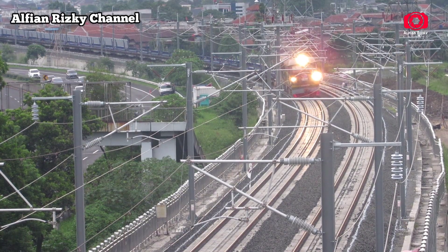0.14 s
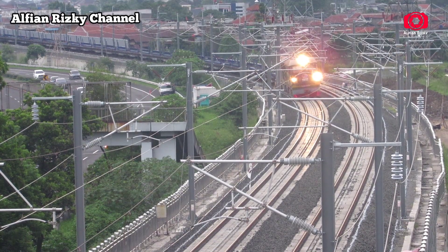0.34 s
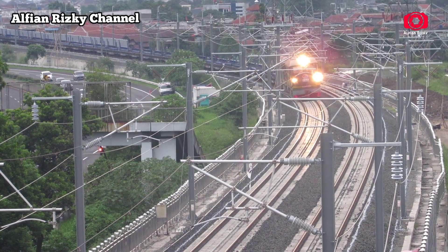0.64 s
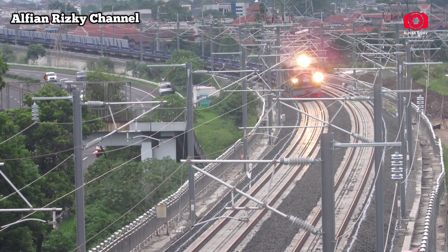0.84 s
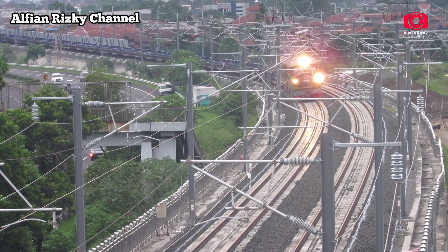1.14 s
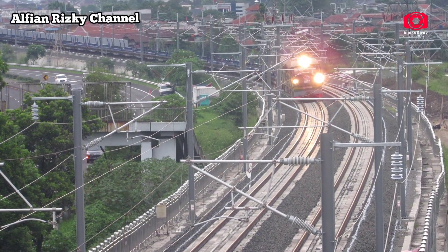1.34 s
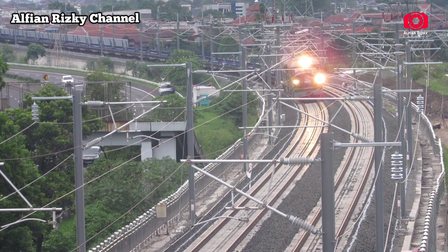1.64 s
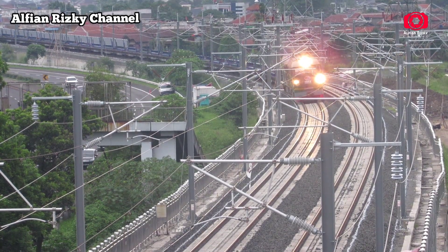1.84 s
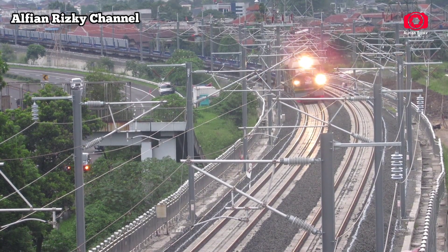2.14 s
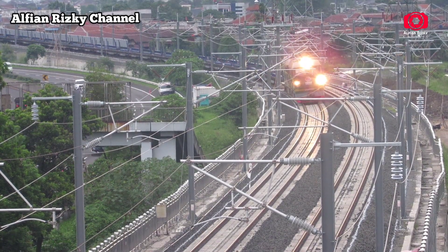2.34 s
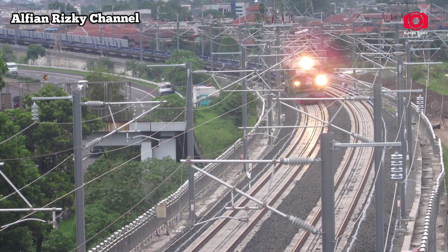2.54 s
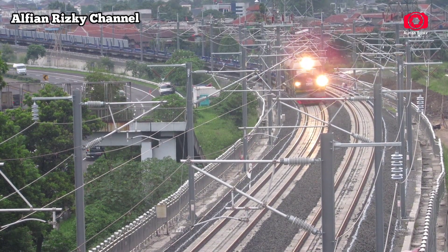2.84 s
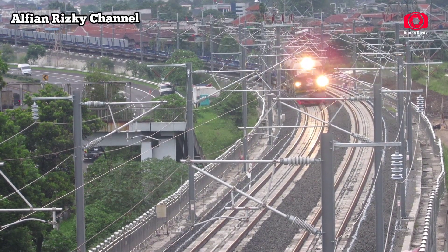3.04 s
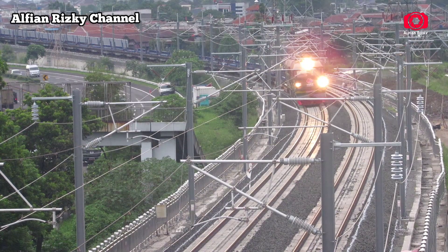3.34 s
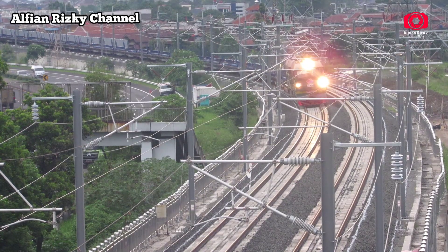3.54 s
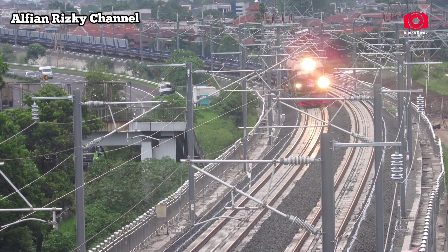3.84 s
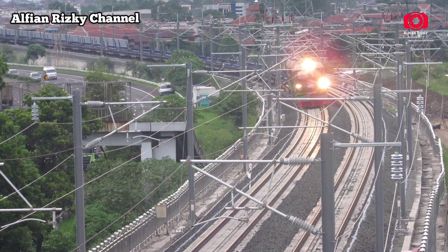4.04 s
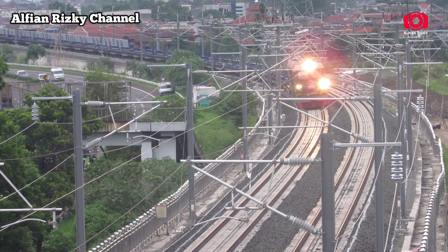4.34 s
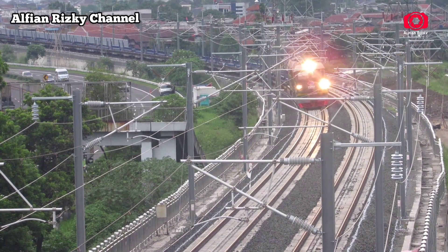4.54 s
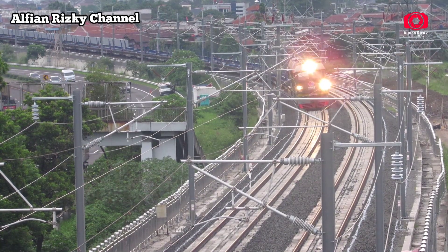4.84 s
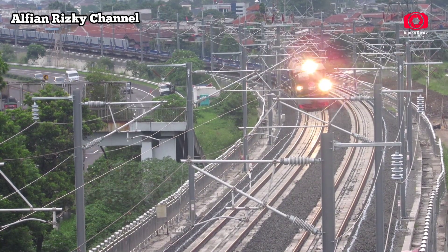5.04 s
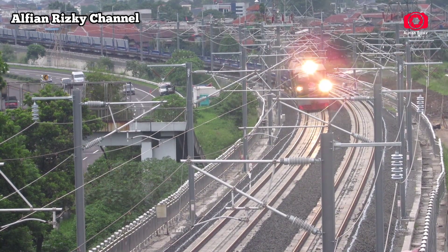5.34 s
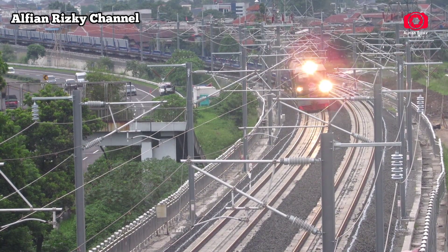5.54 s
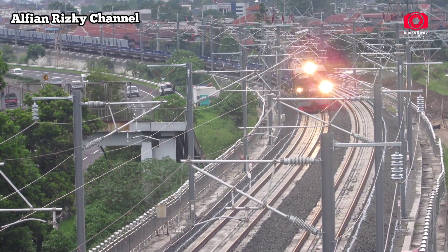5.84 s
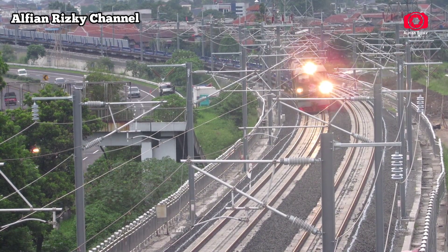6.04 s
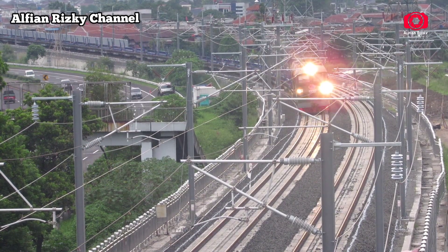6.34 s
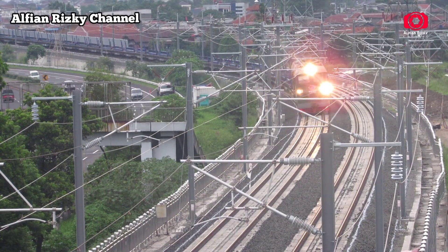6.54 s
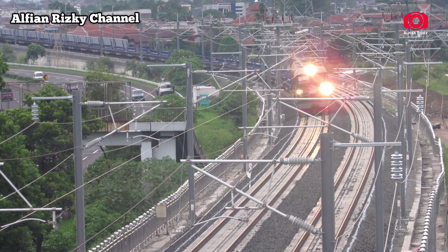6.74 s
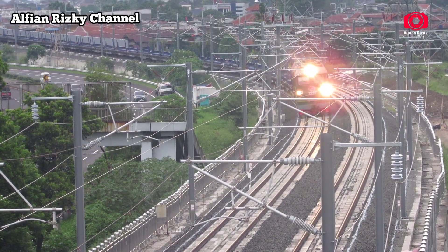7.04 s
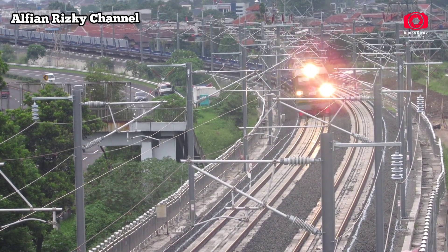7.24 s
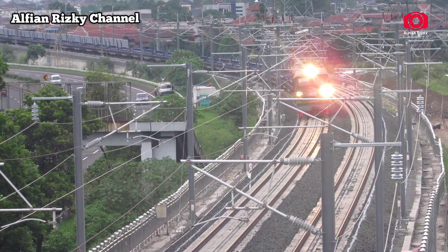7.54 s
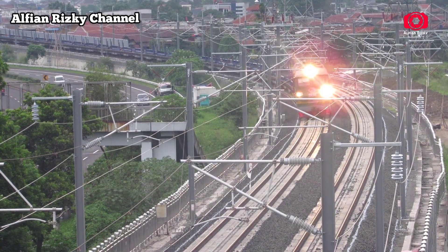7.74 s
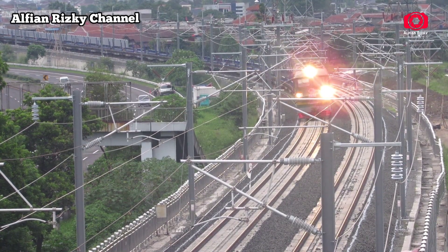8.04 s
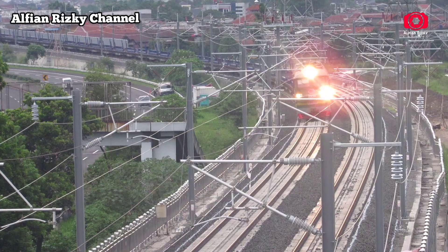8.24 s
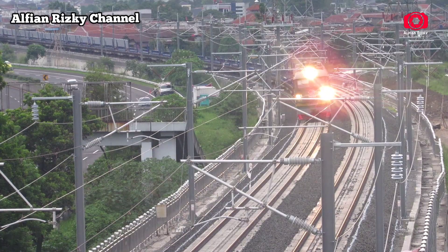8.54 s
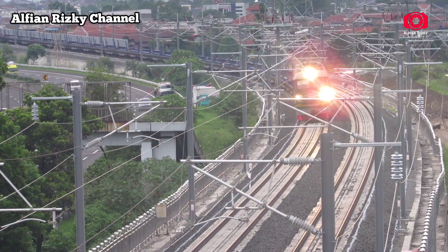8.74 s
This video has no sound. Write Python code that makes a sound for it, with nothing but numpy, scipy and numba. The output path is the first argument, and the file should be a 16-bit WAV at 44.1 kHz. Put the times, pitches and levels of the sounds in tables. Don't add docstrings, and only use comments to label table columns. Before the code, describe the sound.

Loud ragged motorcycle popping fades at about three seconds, giving way to swelling road traffic with droning engines, tyre roar, swishes and wind buffets.

```python
import sys
import numpy as np
from scipy import signal
from scipy.fft import rfft, irfft, next_fast_len
from scipy.io import wavfile
from scipy.ndimage import uniform_filter1d
from numba import njit

SR = 44100
rng = np.random.default_rng(int(sys.argv[2]) if len(sys.argv) > 2 else 0)


def log_audio(samples):
    frames = np.atleast_2d(samples).T
    limited = np.clip(frames, -1, 1)
    pcm = np.round(limited * 32767).astype(np.int16)
    wavfile.write(sys.argv[1], SR, pcm)


def gain_from_db(level_db):
    decades = np.asarray(level_db, float) / 20
    return 10 ** decades


N = 392049

# time [s], thump [dB],
# crack [dB], crack colour [Hz].
EXHAUST_POPS = [(0.0105, -8.0, -41, 6900), (0.0315, -8.0, -45, 9000), (0.0573, -9.5, -43, 6500),
                (0.0829, -9.0, -43, 11500), (0.1008, -8.5, -42, 11900), (0.1268, -13.0, -42, 7200),
                (0.162, -6.0, -54, 10200), (0.1789, -7.0, -52, 8400), (0.2086, -6.0, -51, 5000),
                (0.2336, -5.0, -56, 5300), (0.2598, -6.5, -43, 5000), (0.2835, -8.0, -43, 6900),
                (0.3085, -3.5, -38, 5000), (0.3326, -10.0, -50, 10300), (0.3572, -1.5, -43, 5200),
                (0.3773, -12.0, -48, 4700), (0.4244, -11.5, -51, 5200), (0.4593, -12.0, -53, 9300),
                (0.471, -10.5, -47, 9500), (0.4878, -10.0, -51, 6200), (0.5232, -9.0, -43, 4300),
                (0.5405, -9.0, -47, 6500), (0.565, -9.5, -45, 5700), (0.5828, -12.0, -52, 6700),
                (0.6115, -7.5, -46, 5500), (0.6279, -10.5, -46, 5700), (0.6623, -8.0, -38, 8300),
                (0.678, -9.0, -41, 5700), (0.7031, -9.5, -42, 5900), (0.7453, -7.0, -52, 9100),
                (0.7944, -10.5, -54, 7200), (0.8137, -3.5, -53, 7200), (0.8449, -9.0, -50, 6200),
                (0.9114, -5.0, -48, 8800), (0.9635, -3.0, -50, 6700), (1.0067, -4.5, -48, 7400),
                (1.0368, -6.0, -55, 5500), (1.0551, -5.0, -51, 7400), (1.0733, -5.5, -55, 9100),
                (1.1096, -5.5, -53, 8800), (1.1388, -6.5, -52, 5000), (1.2377, -6.5, -48, 7200),
                (1.2816, -7.5, -42, 10000), (1.3102, -8.5, -38, 7200), (1.3394, -8.0, -37, 5500),
                (1.3681, -10.0, -40, 9600), (1.4048, -9.0, -39, 10000), (1.4329, -8.5, -39, 7900),
                (1.4611, -10.5, -42, 11000), (1.5184, -10.5, -49, 10700), (1.5536, -7.5, -37, 9500),
                (1.5811, -7.0, -45, 12700), (1.6238, -11.0, -44, 6200), (1.6513, -9.5, -48, 5900),
                (1.694, -8.0, -39, 7100), (1.7222, -7.0, -39, 7200), (1.7718, -12.0, -50, 8100),
                (1.7929, -7.5, -38, 7400), (1.8344, -6.5, -38, 8100), (1.8617, -7.5, -44, 9000),
                (1.9082, -10.0, -45, 8800), (1.9278, -6.5, -34, 12900), (1.9601, -5.0, -37, 8600),
                (1.978, -6.5, -40, 8100), (2.0096, -5.5, -37, 10200), (2.0212, -7.0, -37, 8800),
                (2.0541, -5.5, -36, 9800), (2.074, -4.0, -36, 8800), (2.0936, -7.5, -43, 9300),
                (2.1129, -11.0, -50, 6200), (2.1458, -6.0, -35, 11700), (2.1904, -5.5, -42, 6700),
                (2.2071, -10.0, -47, 6900), (2.2342, -5.5, -40, 11500), (2.2512, -13.5, -51, 10000),
                (2.3014, -4.5, -44, 6000), (2.388, -7, -37, 9000), (2.4437, -9.5, -46, 11400),
                (2.4713, -13.0, -58, 10000), (2.5609, -10.5, -51, 7100), (2.6061, -11.0, -46, 7100),
                (2.6287, -12.5, -51, 8600), (2.658, -10.5, -46, 10700), (2.6729, -10.5, -45, 10300),
                (2.7098, -8.0, -47, 7900), (2.7322, -10.5, -47, 8400), (2.7544, -10.0, -43, 8400),
                (2.7835, -11.5, -47, 12600), (3.0814, -13.5, -49, 7100),
                (1.3969, -23, -41, 7120), (1.4897, -11.5, -47, 9140), (1.953, -26, -54, 8710),
             (2.217, -18, -42, 9900), (2.245, -24, -44, 10540), (2.508, -16, -60, 7930),
             (2.614, -10, -44, 7120), (2.681, -17, -50, 7640), (2.796, -24, -55, 7130),
             (3.1386, -13, -52, 8030)]
# time [s], level [dB].
FAR_THUDS = [(2.9158, -15.5), (3.359, -19), (3.3782, -18), (3.4184, -15), (3.8719, -15), (4.1499, -9),
             (4.1655, -8), (4.9722, -7), (5.2672, -5), (5.6491, -16), (6.1483, -9), (6.1662, -10.5),
             (6.2722, -9), (6.3786, -11.5), (6.4153, -4), (6.628, -12), (6.6567, -8), (6.8434, -15),
             (6.9344, -20), (7.1086, -7.5), (7.3774, -13), (7.4603, -13), (7.5243, -7), (7.5984, -5),
             (7.6297, -3), (7.664, -8), (7.68, -13), (7.7362, -16), (7.803, -14), (7.8242, -7),
             (8.239, -21)]
# time from its peak [s], half length [s], size.
BLAST_SHAPE = [
    (-.0016, 0.00043, -1.25),
    (0, 0.00045, 1),
    (.0009, 0.0021, 0.17),
    (.003, 0.00077, -0.26),
]
# time [s], broad boom [dB], upper edge of the blast [dB], shell knock [dB].
SILENCER = [(0, -5, 2.5, 0), (.3, -8, 3.5, 4), (.6, -4, 4, -4), (.9, -7.5, 1.5, -6), (1.2, 1, 0, -6),
            (1.28, -0.5, -15, -13), (1.55, 1.5, -3, -7), (1.9, -2.5, 1, -4), (2.1, -15, 1, 0),
            (2.3, -14, 2.5, 9), (2.42, 2, 1.5, 4), (2.8, -12, -1, 2)]
# time [s], pitch [Hz], level [dB].
RING_NOTE = [
    (0.38, 201, -32),
    (0.44, 167, -31),
    (1.2, 165, -32),
    (1.26, 137, -30),
    (1.8, 143, -30),
    (2.05, 182, -31),
    (2.32, 181, -32),
    (2.4, 138, -36),
    (2.8, 138, -37),
]
# multiple of the loudest note, level [dB].
RING_ORDERS = [(1, 0), (1.75, -12), (2, -6), (3, -8), (4, -12)]
# centre [Hz], width [Hz], level [dB].
SHELL_MODES = [(900, 140, 2), (1270, 240, -2), (1520, 140, -9)]
# time [s], steady shell rasp [dB], tail-pipe whistle [dB], wall slap [dB].
BIKE_PLACE = [(0, -40.5, 6, -26), (.58, -40.5, -12, -16), (.7, -69, 4, -20), (1.25, -68, -3, -26),
              (1.45, -83, 2, -24), (1.8, -45, 1, -21), (2.1, -58, -12, -5.5), (2.26, -55, -6, -6),
              (2.3, -54, -1, -17), (2.5, -58, -4, -17), (2.85, -68, -3, -10)]
# time [s], level [dB].
THROTTLE = [
    (0, 2),
    (.44, -0.5),
    (.69, 0.5),
    (1.08, -9.5),
    (1.55, -4.5),
    (2.15, -0.5),
    (2.43, -11.5),
    (2.8, -13.5),
    (3.1, -17),
]
# time [s], level [dB].
NEARNESS = [(0, -13), (1.1, -17), (2.1, -13.5), (2.43, -13.5), (3.14, -9), (3.81, -4.5), (4.2, -0.5),
            (4.63, 1.5), (5.2, 0), (5.57, -1.5), (6.35, 1.5), (6.64, 0.5), (6.95, 2.5), (7.65, 1.5),
            (7.92, -0.5), (8.3, 0.5), (8.89, 0)]
# frequency [Hz], density [dB per Hz].
RUMBLE_SPECTRUM = [(25, -14), (42, -32), (65, -3.5), (110, 0.5), (175, 1), (240, -3.5), (320, -6.5),
                   (420, -9), (520, -17), (700, -20)]
# frequency [Hz], density [dB per Hz].
ROAR_SPECTRUM = [(600, -3.5), (850, 5.5), (1200, 2), (1500, -5), (2000, -14.5), (3000, -22.5), (4500, -30)]
# frequency [Hz], density [dB per Hz].
HISS_SPECTRUM = [(1800, 12), (2500, 7.5), (4000, 3.5), (6000, 3), (9000, 3.5), (11500, 0.5), (14500, -4.5)]
# start [s], end [s], level [dB].
SWISHES = [
    (4.68, 4.87, -46),
    (5.115, 5.237, -47),
    (5.404, 5.933, -52.5),
    (6.396, 6.58, -55.5),
    (6.826, 6.98, -44),
    (7.077, 7.218, -47),
    (7.423, 8.146, -49.5),
    (8.255, 8.3, -52.5),
    (8.64, 8.71, -50),
]
# start [s], end [s], level [dB], centre [Hz].
SPRAY = (7.52, 8.14, -48, 12800)
# start [s], end [s], pitch [Hz], level [dB].
SQUEALS = [
    (8.12, 8.301, 2800, -55),
    (8.122, 8.3, 3260, -63),
    (8.5, 8.682, 3530, -67),
]
# start [s], end [s], firing
# at start [Hz], at end [Hz], level [dB].
DRONES = [(0, .33, 111, 124, -38), (0, .3, 228, 238, -36), (.95, 1.65, 98, 110, -41),
          (.62, .7, 250, 258, -31), (1.9, 2.35, 88, 128, -37), (.2, .38, 200, 204, -33),
          (.45, .85, 168, 160, -36), (1.14, 1.22, 165, 160, -35), (1.85, 2.05, 150, 182, -36),
          (2.43, 2.5, 255, 258, -39), (2.57, 2.82, 258, 276, -35), (2.57, 2.8, 385, 420, -43),
          (1.8, 2.05, 290, 370, -41), (2.95, 3.5, 300, 357, -48), (3.56, 4.55, 348, 398, -45),
          (4.0, 4.6, 245, 255, -38), (4.4, 5.0, 128, 131, -31), (5.05, 5.35, 140, 148, -28),
          (4.55, 4.85, 178, 182, -31), (4.9, 5.3, 185, 170, -29), (5.85, 6.3, 395, 410, -41),
          (5.55, 5.7, 205, 198, -32), (4.7, 5.3, 78, 74, -41), (7.7, 8.1, 88, 95, -39),
          (7.0, 7.15, 225, 220, -33), (6.3, 6.7, 135, 130, -33), (7.2, 7.5, 340, 355, -40),
          (5.75, 6.0, 170, 165, -27), (6.15, 6.7, 166, 155, -30), (6.8, 7.4, 160, 175, -29.5),
          (7.55, 7.75, 203, 200, -27), (7.95, 8.3, 186, 186, -28), (8.36, 8.89, 184, 192, -26),
          (8.65, 8.89, 150, 146, -29)]
# multiple of the firing note, level [dB].
DRONE_ORDERS = [(1, 2.5), (2, -14)]
# centre [s], length [s], level [dB].
GUSTS = [
    (3.87, .04, -26),
    (3.96, .05, -26),
    (4.25, .11, -26),
    (4.56, .08, -38),
    (6.95, .15, -33),
    (8.5, .2, -37),
    (8.72, .13, -22),
    (6.8, 2.8, -40),
]
# frequency [Hz], shared part [dB], phase lead [rad], unshared part [dB].
PORTS = [(40, -9.5, 2.44, -31), (180, -9, 3.34, -31.5), (504, -8, 2.57, -27.5), (1060, -5.5, 1.875, -13),
         (1810, -4.5, 1.1, -10), (2800, -5.5, 0.4, -8), (4600, -9.5, .12, -8), (7300, -12.5, 0.97, -10.5),
         (12500, -15, 2.14, -13), (14800, -24, 2.5, -14)]
# upper edge [Hz], level under which the band is dropped [dB].
TOP_BANDS = [(13300, -76), (14200, -72), (15150, -63.5)]


def motorcycle():
    s, thump_db, rasp_db, crack_db, crack_hz = firings()
    thump = silencer(exhaust_blast(s, thump_db))
    return thump + shell_rasp(s, thump_db, rasp_db) + gas_crack(s, crack_db, crack_hz)


def firings():
    s, thump_db, crack_db, crack_hz = np.transpose(sorted(EXHAUST_POPS))
    throttle_db = np.interp(s, *np.transpose(THROTTLE))
    scatter_db = 1.5 * rng.standard_normal(len(s))
    rasp_db = thump_db - 20 + throttle_db + scatter_db
    return s, thump_db, rasp_db, crack_db, crack_hz


def exhaust_blast(s, thump_db):
    round_trip_s, returned = 0.00756, 0.15
    open_end_hz, muffle_hz = 67.5, 694
    rebound_s, rebound_half_s, rebound_size = 0.0029, 0.0012, 0.2
    t = np.arange(2000) / SR
    blast = sum(size * np.exp(-((t - .004 - at) / half) ** 2) for at, half, size in BLAST_SHAPE)
    far_s, far_db = np.transpose(FAR_THUDS)
    near = spikes(s - .0045, gain_from_db(thump_db - 2.85))
    far = spikes(far_s - .0045, gain_from_db(far_db))
    thump = shape(near + far, blast)
    boom_db = curve(SILENCER)[0]
    suction = -rebound_size * np.exp(-((t - .004 - rebound_s) / rebound_half_s) ** 2)
    thump = thump + gain_from_db(boom_db) * shape(spikes(s - .0045, gain_from_db(thump_db)), suction)
    loop = np.zeros(int(round_trip_s * SR) + 21)
    loop[0] = 1
    loop[-41:] = -returned * np.hanning(41) / 20
    thump = signal.lfilter([1], loop, thump)
    thump = signal.sosfilt(signal.butter(2, open_end_hz, "high", fs=SR, output="sos"), thump)
    return signal.sosfilt(signal.butter(4, muffle_hz, fs=SR, output="sos"), thump)


def silencer(thump):
    boom_db, knock_db, _ = curve(SILENCER)
    ring_hz, ring_db = curve(RING_NOTE)
    lower_chamber = gain_from_db(6) * band(thump, 0.7 * ring_hz, 22)
    boom = band(thump, ring_hz, 45) + lower_chamber
    knock = band(thump, 590, 256)
    thump = thump + gain_from_db(boom_db - 4.5) * boom + (gain_from_db(knock_db) - 1) * knock
    order_db = np.clip(ring_db + 33, -3, 5)
    thump = thump + sum(gain_from_db(order_db + db) * band(thump, k * ring_hz, 20 * k) for k, db in RING_ORDERS[1:])
    thump = thump + 1.8 * gain_from_db(ring_db + 31) * band(thump, ring_hz, 12)
    turn = 2 * np.pi * np.cumsum(ring_hz * (1 + .01 * walk(12))) / SR
    hum = sum(gain_from_db(2.3 * db + 1.5 * walk(14)) * np.sin(k * turn) for k, db in RING_ORDERS)
    return thump + gain_from_db(ring_db) * gate(0, 2.8, 1, 0.023) * hum


def shell_rasp(s, thump_db, rasp_db):
    shell = unit(sum(gain_from_db(db) * twice(white(), hz, wide_hz) for hz, wide_hz, db in SHELL_MODES))
    shell_db, steady_db = curve(SILENCER)[2], curve(BIKE_PLACE)[0]
    buzz = puffs(s, rasp_db - 15.0, 0.045)
    snap = gain_from_db(shell_db) * puffs(s, thump_db - 31.5, 0.016)
    return shell * (buzz + snap + gain_from_db(steady_db))


def gas_crack(s, crack_db, crack_hz):
    far_from_s, wall_s = 2.2, 0.0108
    _, whistle_db, slap_db = curve(BIKE_PLACE)
    last = np.clip(np.searchsorted(s - .003, np.arange(N) / SR) - 1, 0, None)
    other_hz = (4500 * 2 ** (1.5 * rng.random(len(s))))[last]
    gas = white()
    main = unit(twice(gas, crack_hz[last], 4000))
    other = .7 * unit(twice(gas, other_hz, 4500))
    whistle = gain_from_db(whistle_db) * unit(twice(gas, 2750 * (other_hz / 7500) ** .25, 1100))
    air = 0.66 * unit(band(gas, 11050, 5400))
    burst = puffs(s, crack_db + np.where(s < far_from_s, 3, -2), 0.013)
    tail = puffs(s, crack_db + np.where(s < far_from_s, -14, -5.5), 0.05)
    crack = (main + other + whistle + air) * (burst + tail)
    return crack + sum(gain_from_db(k * slap_db) * np.roll(crack, int(k * wall_s * SR)) for k in (1, 2))


def puffs(s, db, t60_s):
    t = np.arange(2000) / SR
    return shape(spikes(s - .0022, gain_from_db(db)), np.minimum(t / 0.0005, 1) * gain_from_db(-60 * t / t60_s))


def traffic():
    return road_rumble() + tyre_roar() + tread_hiss() + sum(drone(*row) for row in DRONES)


def drone(start_s, end_s, start_hz, end_hz, db):
    hz = np.interp(np.arange(N) / SR, [start_s, end_s], [start_hz, end_hz])
    phase = 2 * np.pi * np.cumsum(hz * (1 + .015 * walk(22) + .009 * walk(6))) / SR
    waver = gain_from_db(2.6 * walk(22) + 2 * walk(8))
    tone = sum(gain_from_db(g) * np.sin(k * phase + k * k) for k, g in DRONE_ORDERS)
    if start_s > 3.5:
        tone = gain_from_db(-2) * tone + gain_from_db(-5) * unit(twice(white(), hz, 22))
    else:
        waver = np.sqrt(waver)
    return gate(start_s, end_s, .08, .08) * gain_from_db(db + 8.5) * waver * tone


def road_rumble():
    (near_db,), (throttle_db,) = curve(NEARNESS), curve(THROTTLE)
    road = road_noise(RUMBLE_SPECTRUM, shared_db=.8, own_db=.5, rate=16)
    block = unit(twice(white(), 163, 160))
    return gain_from_db(-25 + 8 + 0.85 * near_db) * road + gain_from_db(-31 + 9.0 + throttle_db) * block


def tyre_roar():
    near_db, = curve(NEARNESS)
    return gain_from_db(-38.5 + near_db + 6.5) * road_noise(ROAR_SPECTRUM, shared_db=.4, own_db=.8, rate=25)


def tread_hiss():
    (near_db,), (throttle_db,) = curve(NEARNESS), curve(THROTTLE)
    swish = sum(gain_from_db(db) * gate(start, end, 0.067, .12) for start, end, db in SWISHES)
    tread = np.hypot(gain_from_db(-51 + 1.67 * near_db), gain_from_db(-52.5 + .5 * throttle_db))
    noise = road_noise(HISS_SPECTRUM, shared_db=0.83, own_db=-0.57, rate=28)
    hiss = gain_from_db(2.5) * np.hypot(tread, swish) * noise
    hiss = hiss + gain_from_db(1) * swish * unit(band(white(), 2080, 1150))
    for start, end, hz, db in SQUEALS:
        flutter = gain_from_db(db + 7.6 * walk(30))
        hiss = hiss + flutter * gate(start, end, 0.015, 0.025) * unit(band(white(), hz, 120))
    start, end, spray_db, spray_hz = SPRAY
    spray = unit(band(white(), spray_hz, 13000))
    return hiss + gate(start, end - .1, 0.017, 0.11) * gain_from_db(spray_db) * spray


def road_noise(spectrum, shared_db, own_db, rate):
    hz, db = np.transpose(spectrum)
    out, swell = 0, walk(rate)
    for f in hz[0] * 2 ** np.arange(0, np.log2(hz[-1] / hz[0]), 1 / 3):
        wide_hz = f / 3 * (1 + (f / 11000) ** 2)
        noise = unit(twice(white(), f, wide_hz))
        gain_db = np.interp(np.log(f), np.log(hz), db) + 10 * np.log10(f)
        gain_db = gain_db + shared_db * swell + own_db * walk(rate / 2)
        out = out + gain_from_db(gain_db) * noise
    return unit(out)


def wind():
    t = np.arange(N) / SR
    gust = sum(gain_from_db(db) * np.exp(-((t - s) / length) ** 4) for s, length, db in GUSTS)
    thuds = signal.sosfilt(signal.butter(2, [28, 150], "band", fs=SR, output="sos"), white())
    return gust * gain_from_db(3 * walk(25)) * unit(thuds)


def bounce(x, depth, hz, wide_hz):
    return x - depth * band(x, hz, wide_hz)


def ports(x):
    size = next_fast_len(N + 8192)
    at = np.log(np.arange(1, size // 2 + 2) * SR / size)
    hz, shared_db, lead, own_db = np.transpose(PORTS)
    shared, turn, own = (np.interp(at, np.log(hz), c) for c in (shared_db, lead, own_db))
    spectrum, wander = rfft(x, size), 4 * walk(140)
    in_phase, quarter = (irfft(spectrum * gain_from_db(own) * q, size)[:N] for q in (1, 1j))
    left = irfft(spectrum * gain_from_db(shared) * np.exp(1j * turn), size)[:N]
    return np.array([left + in_phase * np.cos(wander) + quarter * np.sin(wander), x])


@njit
def svf(x, hz, width):
    y, b, l = np.empty(len(x)), 0., 0.
    for i in range(len(x)):
        g, k = np.tan(np.pi * hz[i] / SR), width / hz[i]
        v = (b + g * (x[i] - l)) / (1 + g * (g + k))
        b, l, y[i] = 2 * v - b, l + 2 * g * v, k * v
    return y


def band(x, hz, wide_hz):
    return svf(x, np.clip(hz * np.ones(N), 10, SR / 2.3), float(wide_hz))


def twice(x, hz, wide_hz):
    return band(band(x, hz, wide_hz), hz, wide_hz)


def white():
    return rng.standard_normal(N)


def unit(x):
    return x / np.sqrt(np.mean(x ** 2))


def walk(rate):
    k = int(SR / rate)
    steps = rng.standard_normal(N // 100)[:N // k + 1]
    return unit(uniform_filter1d(uniform_filter1d(np.repeat(steps, k), k), k)[:N])


def curve(rows):
    s, *columns = np.transpose(rows)
    return [np.interp(np.arange(N) / SR, s, c) for c in columns]


def gate(start_s, end_s, attack_s, release_s):
    corners = [start_s - attack_s, start_s, end_s, end_s + release_s]
    return np.interp(np.arange(N) / SR, corners, [0, 1, 1, 0])


def spikes(s, size):
    return np.bincount(np.clip(s * SR, 0, N - 1).astype(int), size, N)


def shape(x, pulse):
    return signal.fftconvolve(x, pulse)[:N]


def scene():
    bike = bounce(motorcycle(), 1, 737, 206)
    road = bounce(traffic(), 0.86, 690, 266)
    return ports(bike + road) + wind() * np.array([[1], [-1.3]])


def low_pass(x):
    return signal.sosfilt(signal.butter(12, 15670, fs=SR, output="sos"), x)


def record(dry):
    soft = np.tanh(.4 * dry) / .4

    def below(hz):
        return signal.sosfiltfilt(signal.ellip(10, .1, 80, hz, fs=SR, output="sos"), soft)

    out = lower = below(12300)
    for edge_hz, open_db in TOP_BANDS:
        upper = below(edge_hz)
        top = upper - lower
        loud = uniform_filter1d(top ** 2, size=1024) > gain_from_db(open_db) ** 2
        opening = uniform_filter1d(uniform_filter1d(1. * loud, size=300), size=300)
        out = out + top * opening
        lower = upper
    return low_pass(out)


dry = scene()
out = record(dry)
log_audio(out)
```